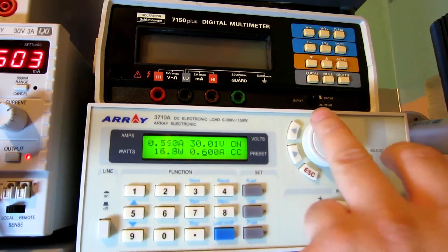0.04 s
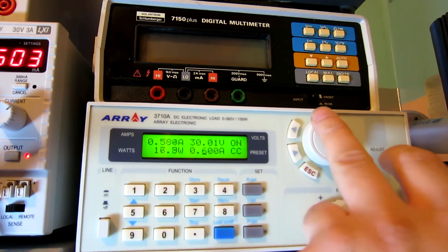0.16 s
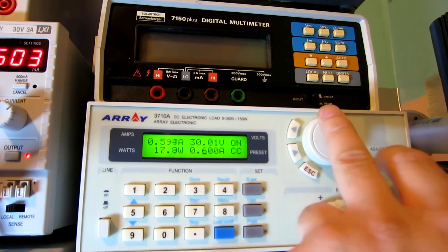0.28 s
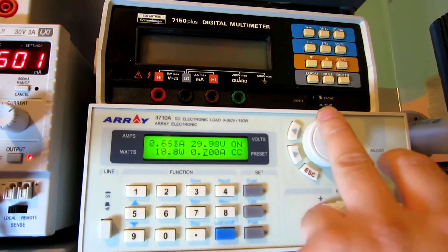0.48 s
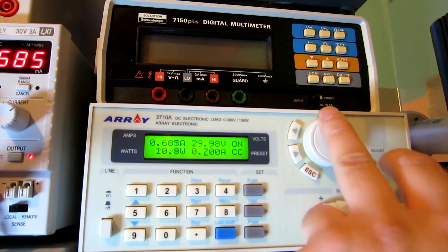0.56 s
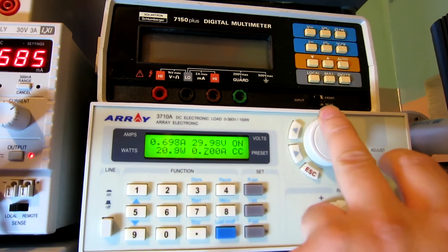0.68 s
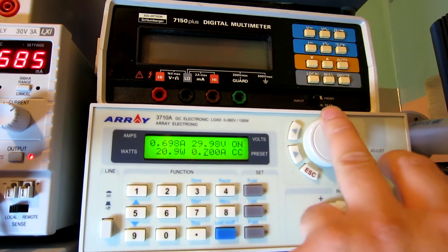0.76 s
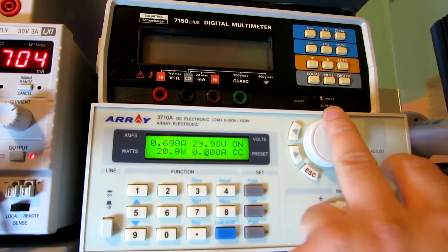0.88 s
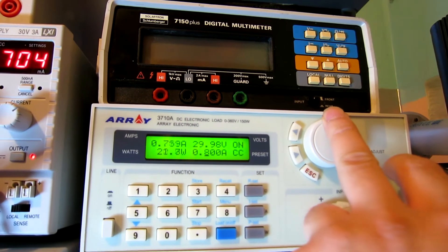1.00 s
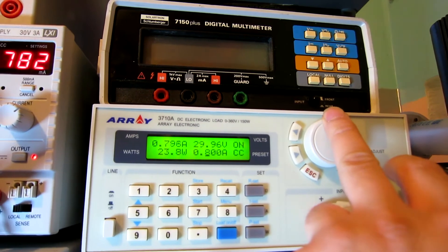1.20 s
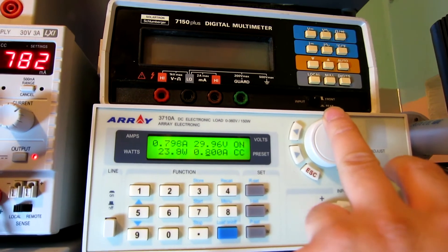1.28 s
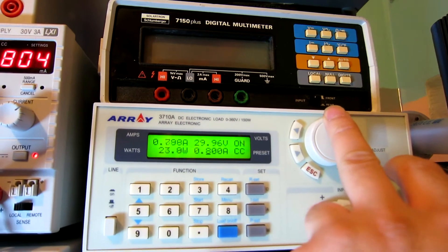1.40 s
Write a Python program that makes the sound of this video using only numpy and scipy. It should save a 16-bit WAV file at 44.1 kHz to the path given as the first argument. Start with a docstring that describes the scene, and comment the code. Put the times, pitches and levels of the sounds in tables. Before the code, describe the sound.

A knob clicks sharply twice over the steady rush of equipment fans.

```python
"""Two detents of a knob

A finger turns the knob of a bench instrument by two detents. Each snap is an impulse that excites
the modes of the spring and knob; a moment later the knob knocks the hollow case, which resonates.
Behind are the broadband rush of fans, a power supply's faint whine and a low rumble.
Gain control ducks the whole sound after each snap."""
import sys
import numpy as np
from scipy import signal
from scipy.fft import irfft
from scipy.io import wavfile
from scipy.ndimage import uniform_filter1d

SR = 44100
rng = np.random.default_rng(int(sys.argv[2]) if len(sys.argv) > 2 else 0)


def master_out(mix):
    """Clip the mix to full scale and print it as 16-bit PCM to the path in sys.argv[1]."""
    frames = np.transpose(np.atleast_2d(mix))
    ceiling = np.clip(frames, -1, 1)
    pcm = np.round(ceiling * 32767).astype(np.int16)
    wavfile.write(sys.argv[1], SR, pcm)


N = 63945
TIME_S = np.arange(N) / SR


def amp(db):
    """Decibel scale: 20 dB is a factor of ten in amplitude."""
    return 10 ** (np.asarray(db) / 20)

def add(mix, start_s, sound):
    """Superposition: a sound adds to the mix from its start time."""
    part = mix[round(start_s * SR):][:len(sound)]
    part += sound[:len(part)]

def noise(gain):
    """Fourier synthesis: random phases under a magnitude curve give noise of rms 1."""
    hz = np.fft.rfftfreq(N, 1 / SR)
    x = irfft(gain(hz) * np.exp(2j * np.pi * rng.random(len(hz))), N)
    return x / x.std()

def coloured(spectrum):
    """Spectral shaping: noise follows relative densities joined on a log frequency axis."""
    points_hz, density_db = np.transpose(spectrum)
    return noise(lambda hz: amp(np.interp(np.log(hz + 1), np.log(points_hz), density_db)))

def narrowband(centre_hz, width_hz):
    """Resonance: noise confined to one narrow peak is heard as a fuzzy tone."""
    return noise(lambda hz: 1 / (1 + 2 * ((hz - centre_hz) / width_hz) ** 2))

def ring(rise_s, t60_s):
    """Damping: after a quick rise, amplitude decays exponentially, 60 dB in t60_s."""
    return (1 - np.exp(-TIME_S / rise_s)) * np.exp(-np.log(1000) * TIME_S / t60_s)

def mode(pitch_hz, rise_s, t60_s):
    """Free vibration: a struck mode is a damped sinusoid."""
    return ring(rise_s, t60_s) * np.sin(2 * np.pi * pitch_hz * TIME_S)


# rush of the fans: frequency_hz, density_db
FAN_SPECTRUM = [(20, -34), (32, -22), (45, -10), (60, -8.5), (90, 0), (190, -0.5), (400, -3), (800, -8),
                (1400, -12), (2500, -17), (4500, -23.5), (9000, -25), (11000, -26.5), (13000, -35.5),
                (15500, -44), (17000, -54)]
# fuzzy tones of the fans and cases: pitch_hz, width_hz, level_db
FAN_PEAKS = [(86.4, 16, -60.5), (148.2, 16, -60), (199.8, 5.3, -57), (338, 19, -63), (1212, 62, -61),
             (5680, 280, -69), (10740, 120, -69.5)]
def fans():
    """Flow noise: moving air gives a steady broadband rush with a few narrow peaks."""
    rush = amp(-46) * coloured(FAN_SPECTRUM)
    return rush + sum(amp(db) * narrowband(hz, width_hz) for hz, width_hz, db in FAN_PEAKS)


# tones of a switching power supply: pitch_hz, relative_level_db
SUPPLY_TONES = [(9700, -74), (10100, -67.5), (10300, -74), (10600, -91), (10800, -71.5), (10900, -76.5)]
def supply_whine():
    """Superposition: steady, closely spaced high sinusoids sum to a thin whine."""
    tones = sum(amp(db) * np.sin(2 * np.pi * (hz * TIME_S + rng.random())) for hz, db in SUPPLY_TONES)
    return amp(-1) * np.sqrt(2) * tones


# envelope of the rumble on the bench: time_s, level_db
RUMBLE_ENVELOPE = [(0, -68), (.7, -74), (.95, -58), (1.18, -63), (1.3, -71), (1.45, -62)]
def bench_rumble():
    """Amplitude modulation: a faint band of low noise swells after the second detent."""
    level_db = np.interp(TIME_S, *np.transpose(RUMBLE_ENVELOPE))
    return amp(level_db) * narrowband(centre_hz=47, width_hz=5.5)


# spring and knob modes: pitch_hz, t60_s, first_detent_db, second_detent_db
KNOB_MODES = [(2760, 0.0071, -27, -57), (3420, 0.073, -31, -50), (3790, 0.011, -27.5, -28.5),
              (4855, 0.0093, -9, -9.5), (5018, 0.052, -26.5, -20.5), (5190, .035, -37, -24),
              (5730, 0.0039, -42, -20.5), (7530, 0.013, -27, -31), (8570, 0.028, -46, -21.5),
              (10200, 0.013, -41, -21.5), (11040, 0.013, -9.5, -24.5), (11740, 0.0079, -5, -15.5),
              (12270, 0.012, -20, -29), (12950, 0.012, -33, -16.5)]
# the plastic's crack, the panel's ringing and the workshop's echo: frequency_hz, density_db
CRACK_SPECTRUM = [(500, -3), (2000, -21), (3500, -7), (5000, -5), (6200, -2.5), (8000, 7), (9300, -9),
                  (11800, 4), (14000, 2), (15500, -29)]
PANEL_SPECTRUM = [(500, -9), (2300, -10.5), (3400, 2), (5000, -1.5), (6100, -7.5), (7900, -0.5),
                  (9200, -7.5), (11800, 0), (13500, -13), (15500, -31)]
ROOM_SPECTRUM = [(200, -8), (1000, 5), (3000, -5), (6000, -5), (8000, 2), (10000, 1), (12200, 1),
                 (14000, -9), (15500, -25)]
def snap(detent, ringing_db):
    """Impulse response: the spring drops into a detent; knob, panel and room ring and decay."""
    rise_s = 0.0002
    modes = sum((-1) ** k * amp(levels_db[detent]) * mode(hz, rise_s, t60_s)
                for k, (hz, t60_s, *levels_db) in enumerate(KNOB_MODES))
    crack = amp(-23.5) * coloured(CRACK_SPECTRUM) * ring(rise_s, t60_s=0.013)
    panel = amp(-27.5) * coloured(PANEL_SPECTRUM) * ring(rise_s, t60_s=0.073)
    room = amp(-41.5) * coloured(ROOM_SPECTRUM) * ring(rise_s=0.0047, t60_s=0.19)
    highpass = signal.butter(2, 1370, "high", fs=SR, output="sos")  # the snap carries little bass
    return signal.sosfilt(highpass, modes + crack + amp(ringing_db) * (panel + room))


# case modes: pitch_hz, t60_s, first_knock_db, second_knock_db, third_knock_db
CASE_MODES = [(363, 0.094, -35, -43, -36), (432.5, 0.061, -38.5, -35, -33), (486, 0.051, -37, -50, -33),
              (846, 0.099, -46, -34, -34.5), (961, 0.058, -38, -46, -37), (1226, 0.094, -32.5, -34, -42.5),
              (1468, 0.049, -34, -35, -43), (1900, 0.041, -33, -30, -51)]
# dense ringing of the hollow case: frequency_hz, density_db
HOLLOW_SPECTRUM = [(120, -21), (280, -16), (420, 7), (700, -3), (1200, -0.5), (2000, -9.5), (3300, -12.5),
                   (5000, -5), (6500, -53), (15000, -40)]
def knock(contact):
    """Impact excitation: the knob settles against the hollow case, which rings in its modes."""
    rise_s = 0.0012
    modes = sum(amp(levels_db[contact]) * mode(hz, rise_s, t60_s) for hz, t60_s, *levels_db in CASE_MODES)
    hollow = amp(-29) * coloured(HOLLOW_SPECTRUM) * ring(rise_s, t60_s=0.055)
    return modes + hollow


# snaps into the detents: start_s, gain_db, ringing_gain_db
DETENTS = [(.2199, 0.5, 1), (.7585, 1, 0)]
# knocks of the knob against the case: start_s, gain_db
CONTACTS = [(.2252, 1), (.7650, -4.5), (.7738, -3)]
def scene():
    """Superposition: two snaps and three knocks add to the sound of the running equipment."""
    mix = fans() + supply_whine() + bench_rumble()
    for detent, (start_s, gain_db, ringing_db) in enumerate(DETENTS):
        add(mix, start_s, amp(gain_db) * snap(detent, ringing_db))
    for contact, (start_s, gain_db) in enumerate(CONTACTS):
        add(mix, start_s, amp(gain_db) * knock(contact))
    return mix[None]


def record(dry):
    """Dynamic compression: gain falls fast at a snap and recovers slowly; a low-pass limits the band."""
    threshold_db, share_removed, recovery_db_per_s, attack_s = -20.5, 0.51, 5, 0.022
    power = abs(uniform_filter1d(dry[0] ** 2, size=88))  # mean over 2 ms
    excess_db = np.maximum(10 * np.log10(power + 1e-12) - threshold_db, 0)
    recovery_db = TIME_S * recovery_db_per_s
    duck_db = np.maximum.accumulate(share_removed * excess_db + recovery_db) - recovery_db
    pole = np.exp(-1 / (attack_s * SR))
    ducked = dry * amp(-signal.lfilter([1 - pole], [1, -pole], duck_db))
    lowpass = signal.firwin(255, cutoff=16000, window=("kaiser", 9), fs=SR)
    return signal.oaconvolve(ducked, lowpass[None], "same")


dry = scene()
out = record(dry)
master_out(out)
```